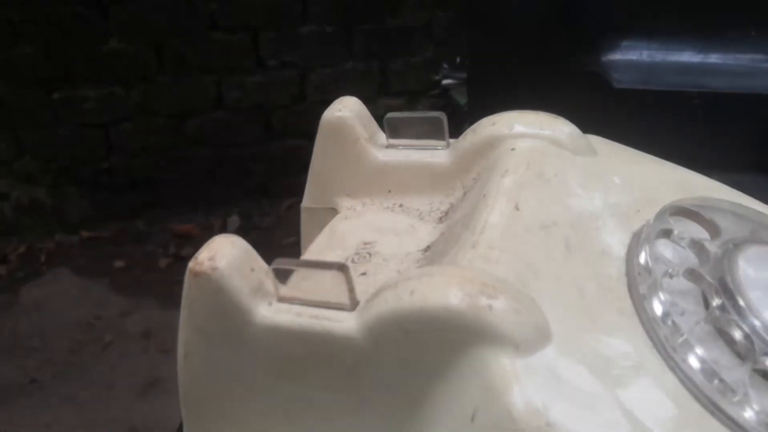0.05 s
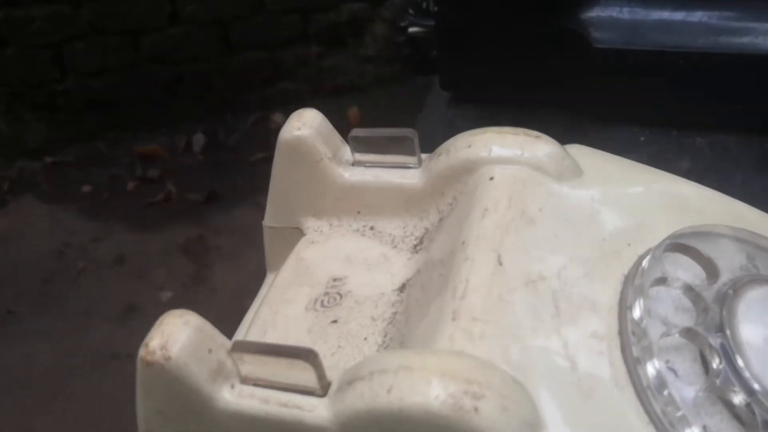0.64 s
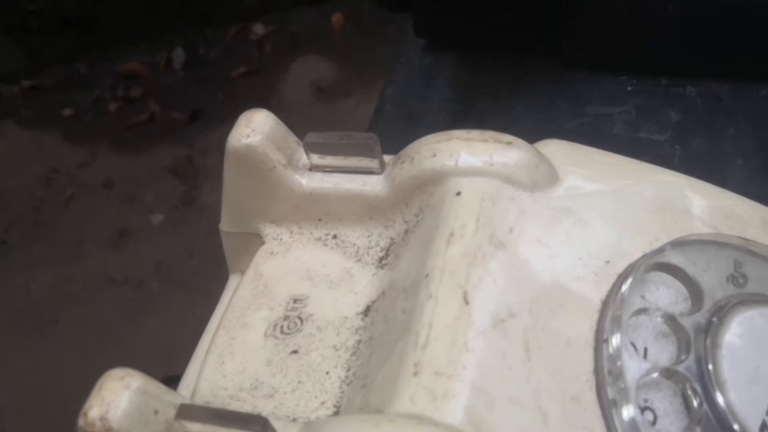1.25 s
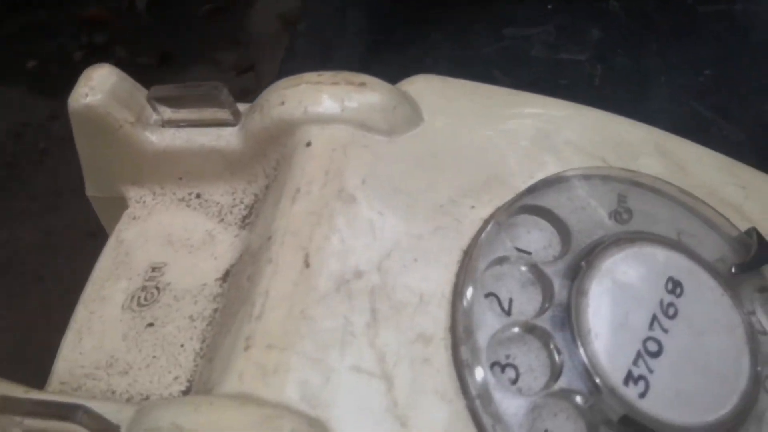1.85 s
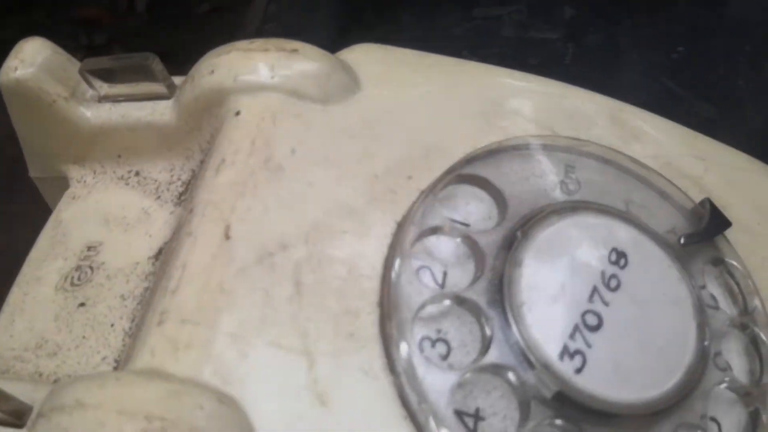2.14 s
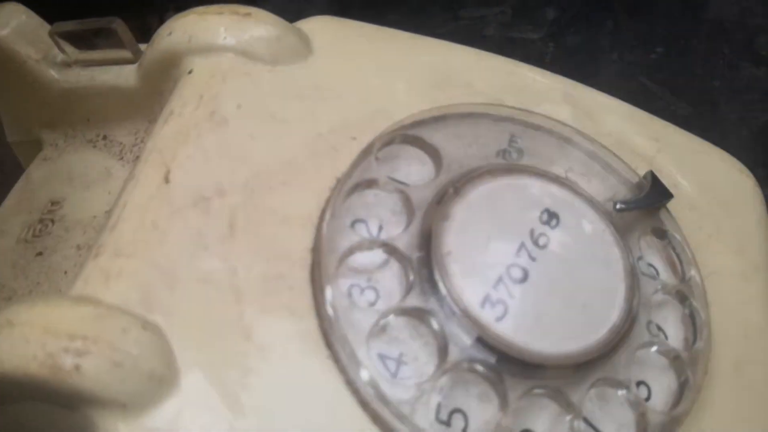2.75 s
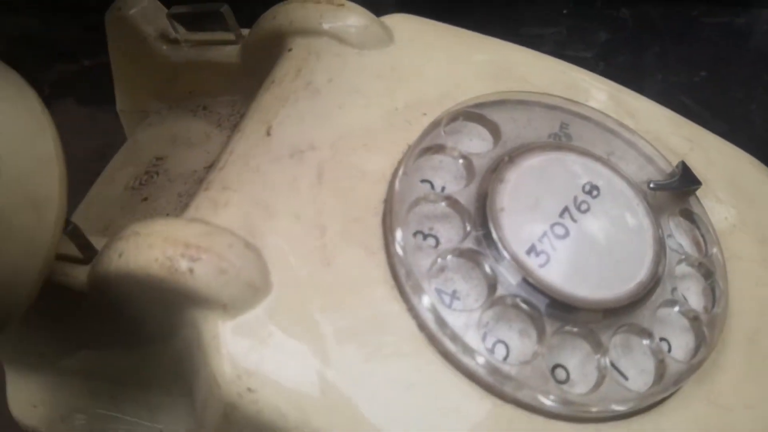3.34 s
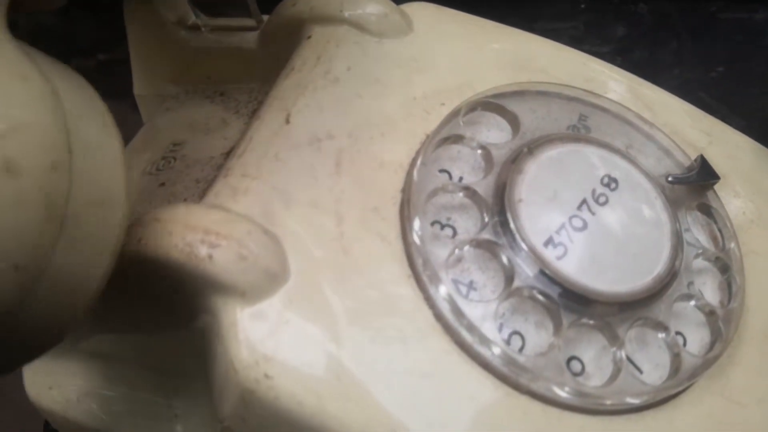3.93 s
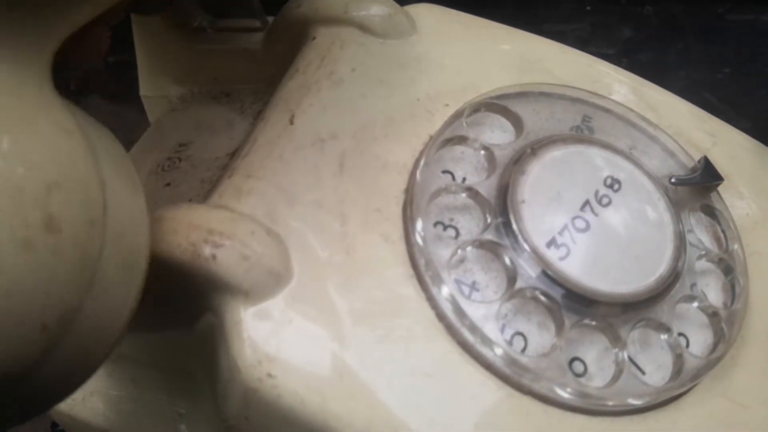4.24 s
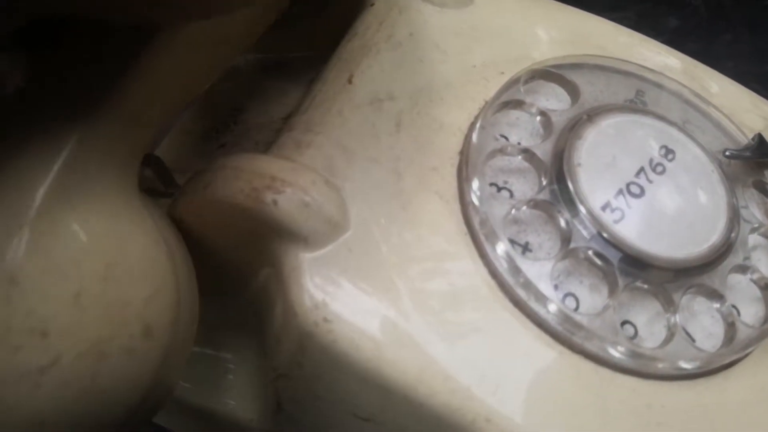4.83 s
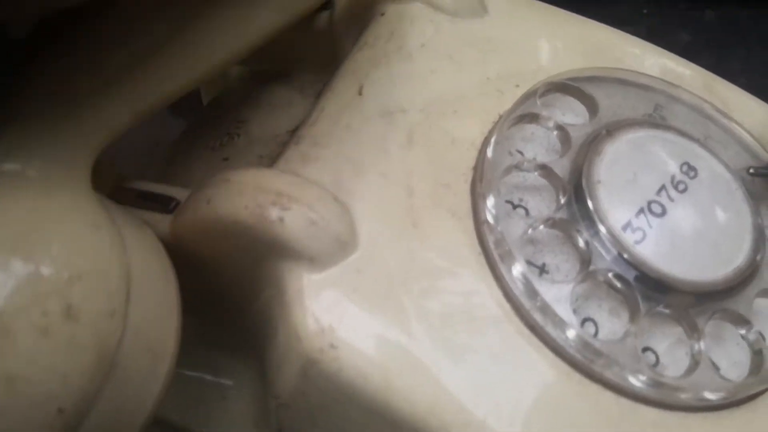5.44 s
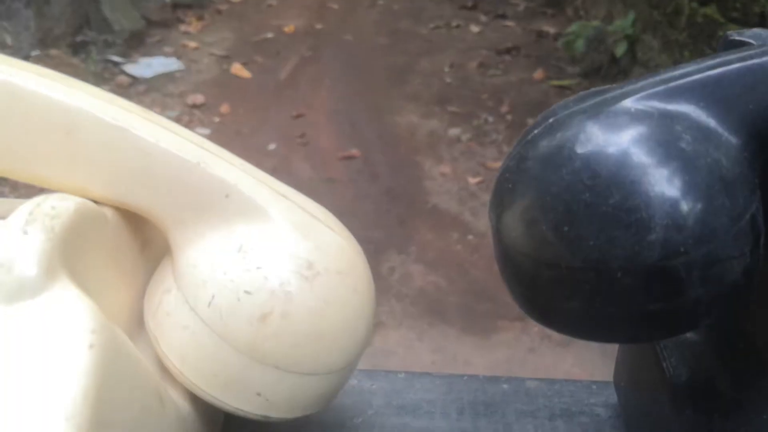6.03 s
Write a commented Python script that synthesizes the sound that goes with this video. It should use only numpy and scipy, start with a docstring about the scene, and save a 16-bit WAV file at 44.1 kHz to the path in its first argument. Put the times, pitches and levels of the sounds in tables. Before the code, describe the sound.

A low murmur of outside air fills a quiet room throughout, with a few barely audible bird whistles far away. A faint hiss lies under the first 1.5 seconds. Close to the microphone, fingers tick on a plastic telephone handset at about 0.7 seconds, then tick and rub between 1.2 and 1.6 seconds. Two soft scuffs follow near 2.4 and 2.9 seconds. From 3.2 seconds the handset is fumbled onto its cradle: uneven plastic clacks, hollow thumps and small rattles, coloured by brief rings and squeaks. Contacts come around 3.6, 4.1 and 4.4 seconds, with the hardest clack at 4.6, more knocks near 4.85 and a last settling thump around 5.1. Just before 6 seconds a finger ticks and slips, then makes one sharp pop at the microphone on the right, the loudest sound, followed by a brief rub.

```python
"""A room with an old dial telephone; outside air murmurs and a few far birds whistle.
A faint steady hiss lies under the first second and a half. A plastic handset is picked up
close to the microphone and fumbled onto the cradle. Fingers tick, rub and make one sharp pop.
Each contact clacks in the shell, thumps in the hollow case and rattles loose parts.
Brief rings colour the knocks and scuffs, with a few squeaks."""
import sys
import numpy as np
from scipy import signal
from scipy.fft import rfft, irfft
from scipy.io import wavfile
from scipy.ndimage import uniform_filter1d

SR = 44100
rng = np.random.default_rng(int(sys.argv[2]) if len(sys.argv) > 2 else 0)


def persist_wave(psi):
    """Save psi, clipped to +-1, as 16-bit WAV."""
    counts = np.round(np.clip(psi, -1, 1) * 32767).astype(np.int16)
    wavfile.write(sys.argv[1], SR, np.atleast_2d(counts).T)


N = 272538
TIME_S = np.arange(N) / SR

# Stereo field. Each row: frequency in Hz, left-right correlation.
CORRELATION = [(60, 1), (150, 0.97), (250, 0.85), (400, 0.14), (800, -0.33), (2000, 0.12), (12000, -0.12)]
# Shading of a source off to the right. Each row: frequency in Hz, left minus right in dB.
SIDE_SHADE = [(250, 0), (800, -4), (2000, -4), (6000, -10.5), (15000, -1)]
# Noise spectra. Each row: frequency in Hz, relative level in dB.
AIR_SPECTRUM = [(20, -6), (60, -3), (126, -1.5), (200, -8.5), (250, -8), (400, -17), (700, -20),
                (1200, -19.5), (1900, -17.5), (3000, -24.5), (3900, -28.7), (7200, -31.2), (9000, -43),
                (15500, -44)]
ROOM_SPECTRUM = [(70, 0), (220, 11.5), (500, -3.5), (1600, -2), (3500, -3.5), (7400, -2), (8800, -19.5),
                 (15500, -37.5)]
HISS_SPECTRUM = [(29, -22), (50, -13.5), (113, 1.5), (214, -12.5), (259, -17.5), (518, -35), (570, -14),
                 (643, -36), (742, -15.5), (876, -20), (2280, -17.5), (7330, -21.5), (15000, -54)]
SLIP_SPECTRUM = [(88, -8), (150, -2), (687, -14.5), (1180, -9.5), (1540, -0.5), (1870, -1.5), (2360, 3),
                 (4290, -5.5), (6940, -3.5), (7640, -6.5), (11900, -30.5), (13600, -29), (15000, -44)]
SCUFF_SPECTRUM = [(400, -20), (600, 0), (800, -1.5), (1000, 0), (1250, -0.5), (1700, 0.5), (1930, 1.5),
                  (2150, -3.5), (2420, 0), (3100, -12.5), (5000, -14.5), (7300, -17), (9000, -29),
                  (15000, -42)]
SHELL_SPECTRUM = [(70, -6.5), (160, -7.5), (370, -2.5), (540, -5.5), (750, -2), (980, 0), (1300, -3),
                  (1650, 2), (2500, -1.5), (3200, -9), (4400, 1), (5600, 3), (7200, -5.5), (8800, -22),
                  (15500, -40.5)]
# Bird calls. Each row: start and end in seconds, start and end pitch in Hz, relative level in dB.
BIRD_CALLS = [(0.38, 0.62, 730, 1080, -65), (0.59, 0.74, 1130, 1165, -62.5),
              (0.12, 0.47, 2030, 1974, -67.5), (1.602, 1.92, 3050, 2900, -68), (1.95, 2.3, 1680, 1580, -69),
              (2.674, 2.841, 7130, 6420, -69.5), (2.955, 3.093, 5850, 5600, -67.5),
              (4.448, 4.61, 6930, 6520, -64), (5.22, 5.358, 2520, 2440, -67.5)]
# Slips that catch abruptly. Each row: start and end in seconds, start and end level in dB.
GRIP_SLIPS = [(3.873, 4.027, -52, -64), (4.278, 4.364, -65, -64.5), (5.934, 5.964, -37, -36.5),
              (5.96, 6.125, -52.5, -42), (6.125, 6.194, -41, -47)]
# Swells. Each row: time of full level in seconds, hold in seconds, relative level in dB.
HISS_SWELLS = [(.1, 1.45, -71.3), (1.19, .06, -71), (1.312, .06, -53.5)]  # steady background hiss, then two finger strokes
HANDSET_SCUFFS = [(2.397, .04, -53), (2.937, .04, -50.5)]
# Ticks of the grip. Each row: start in seconds, peak in dB.
GRIP_TICKS = [(0.747, -48), (1.261, -41), (1.303, -33.5), (1.358, -34.5), (1.559, -33.5), (2.812, -47),
              (5.240, -53), (5.890, -34.5)]
# Brief rings and squeaks. Each row: start in seconds, T60 in seconds, pitch in Hz, level in dB.
BRIEF_RINGS = [(2.385, .2, 1925, -57.5), (2.925, .22, 2423, -50), (3.205, .022, 3840, -26),
               (3.207, .022, 2200, -28), (3.273, .025, 4020, -44), (3.286, .12, 1606, -46),
               (3.614, .03, 820, -31.5), (4.076, .03, 4700, -44), (4.374, .08, 2357, -30.5),
               (4.675, .016, 5130, -32), (4.722, .023, 5200, -32)]
# Modes of handset and case. Each row: frequency in Hz, relative level in dB, T60 in seconds.
PHONE_MODES = [(167, -8.5, .1), (197, -0.5, .07), (245.7, 2, 0.12), (328, -1.5, 0.12), (382, -2.5, 0.055),
               (682, -6, .06), (767, -3, .07), (886, -1, 0.063), (992, 5, 0.038), (1100, -12, 0.049),
               (1390, -4.5, .05), (1628, 6.5, 0.075), (1800, 4.5, 0.02), (2044, -4, .05),
               (2396, -2.5, 0.093), (2518, -7.5, 0.076), (2820, -3, .05), (3824, -7, 0.066),
               (4360, -3, .07), (4880, -5.5, .06), (5000, 1, .1), (5080, 2, .06), (5420, -7, 0.1),
               (5550, -6, .08), (6340, -8.5, 0.036), (7047, -7, .06)]
# Thump, knock, clack and tick bands. Each row: low edge in Hz, high edge in Hz.
CONTACT_BANDS_HZ = [(85, 470), (500, 1250), (1250, 3000), (3000, 12000)]
# Handset on cradle. Each row: start in seconds, length in seconds, clack level in dB,
# weight (thump above clack) in dB, softness (tick below clack) in dB.
CRADLE_CONTACTS = [(3.2042, .0053, -30.5, -22, 0.5), (3.2375, .0015, -40.5, 0, 28),
                   (3.26, .006, -47, -7, 18), (3.283, .006, -57, -10, 12), (3.343, .003, -59, 5, 24),
                   (3.583, .002, -60, -8, 18), (3.614, .003, -37.5, -4, 23), (3.632, .004, -48.5, -3, 16),
                   (4.076, .002, -42, 6, 10), (4.087, .005, -46, 5, 9), (4.178, .002, -58, -20, 12),
                   (4.369, .0094, -38.5, -15, 10), (4.39, .0033, -39, -14, 12), (4.417, .004, -55, 4, 16),
                   (4.544, .0024, -53, -20, 24), (4.601, .002, -48, -10, 16), (4.6186, .0038, -30, -17, -2),
                   (4.622, .0059, -18.3, -18, 4.7), (4.661, .008, -35, 6, 21), (4.7065, .003, -32, -4, 25),
                   (4.7215, .002, -37, 5.5, 5), (4.8468, .0023, -37, 7, 6), (4.8505, .003, -30, 3, 9),
                   (4.859, .0053, -33.5, -0.5, 8), (4.875, .006, -39, -20, 3),
                   (5.0865, .014, -42.5, -11, 10), (5.103, .005, -47, -10, 11),
                   (5.1185, .004, -36.5, 5, 18), (5.146, .004, -49, -15, 7)]


def from_db(db):
    return 10 ** (np.asarray(db) / 20)


def rms(x):
    return np.sqrt(np.mean(x ** 2) + 1e-24)


def pan(left_db):
    return from_db(np.array([[left_db], [-left_db]]) / 2)


def at_hz(points, hz):
    knots_hz, values = np.transpose(points)
    return np.interp(np.log(np.maximum(hz, 1)), np.log(knots_hz), values)


def add(out, start_s, sound):
    i = round(start_s * SR)
    out[:, i:i + sound.shape[-1]] += sound[..., :N - i]


def drift(rate_hz, size=N):
    """Straight lines between Gaussian random points."""
    position = np.arange(size) / SR * rate_hz
    count = int(position[-1]) + 2
    return np.interp(position, np.arange(count), rng.standard_normal(count))


def noise(spectrum, size=N, aside=0.0):
    """Coloured stereo noise, rms 1, correlated in the bass; aside shades the left."""
    hz = np.fft.rfftfreq(size, 1 / SR)
    mid, side = rfft(rng.standard_normal((2, size)))
    alike = np.clip(at_hz(CORRELATION, hz), -1, 1)
    sign = np.array([[1], [-1]])
    gain = from_db(at_hz(spectrum, hz) + sign * aside * at_hz(SIDE_SHADE, hz) / 2)
    x = irfft((np.sqrt(1 + alike) * mid + np.sqrt(1 - alike) * side * sign) * gain, size)
    return x / rms(x)


def whistle(hz, width_hz):
    """Tone on a pitch track, rms 1; each side wavers separately."""
    waver = np.array([drift(4 * width_hz, len(hz)) for _ in range(2)])
    cycles = np.cumsum(hz + width_hz * waver, axis=1) / SR + rng.random((2, 1))
    return np.sqrt(2) * np.sin(2 * np.pi * cycles)


def outside_air(level_db=-58.9, waver_db=1.7):
    """Low murmur with a faint hiss, stronger on the right."""
    return from_db(level_db + waver_db * drift(5.9)) * noise(AIR_SPECTRUM, aside=.42)


def far_birds(waver_share=.02, echo_t60_s=.57, echo_db=-3.5, direct_db=-2.0):
    """Thin whistles, smeared by echoes from walls and trees."""
    out, t = np.zeros((2, N)), np.arange(2 ** 14) / SR
    for start_s, end_s, start_hz, end_hz, db in BIRD_CALLS:
        size = int((end_s - start_s) * SR)
        hz = np.linspace(start_hz, end_hz, size)
        call = from_db(db) * np.hanning(size) * whistle(hz, waver_share * start_hz)
        echoes = rng.standard_normal((2, len(t))) * from_db(-60 * t / echo_t60_s)
        echoes /= np.linalg.norm(echoes[0])
        add(out, start_s, from_db(direct_db) * call)
        add(out, start_s, from_db(echo_db) * signal.fftconvolve(call, echoes, axes=1))
    return out


def swell_envelope(rows, rise_db_per_s, fall_db_per_s):
    """Each row rises, holds and fades."""
    envelope = np.zeros(N)
    for full_s, hold_s, db in rows:
        before_db = rise_db_per_s * np.maximum(full_s - TIME_S, 0)
        after_db = fall_db_per_s * np.maximum(TIME_S - full_s - hold_s, 0)
        envelope += from_db(db - before_db - after_db)
    return envelope


def hiss_and_rubbing(hiss_gain_db=4.5, grain_db=2.0, edge_s=.002):
    """Faint background hiss for the first 1.5 s; grainy strokes, scuffs and slips of the grip."""
    slip = np.zeros(N)
    for start_s, end_s, start_db, end_db in GRIP_SLIPS:
        sliding = (TIME_S >= start_s) & (TIME_S <= end_s)
        slip += sliding * from_db(np.interp(TIME_S, [start_s, end_s], [start_db, end_db]))
    slip = uniform_filter1d(slip, int(edge_s * SR))
    hiss = swell_envelope(HISS_SWELLS, rise_db_per_s=125, fall_db_per_s=155)
    scuff = swell_envelope(HANDSET_SCUFFS, rise_db_per_s=700, fall_db_per_s=190)
    out = slip * noise(SLIP_SPECTRUM, aside=.48)
    out += hiss * from_db(hiss_gain_db) * noise(HISS_SPECTRUM, aside=1.12)
    out += scuff * noise(SCUFF_SPECTRUM, aside=.93)
    return out * from_db(grain_db * drift(250))


def grip_ticks(t60_s=.013):
    """Dry ticks of skin and casing."""
    out, t = np.zeros((2, N)), np.arange(2 ** 11) / SR
    for start_s, peak_db in GRIP_TICKS:
        tick = noise(HISS_SPECTRUM, len(t), aside=.84) * from_db(-60 * t / t60_s)
        add(out, start_s, tick * from_db(peak_db) / np.abs(tick).max())
    return out


def finger_pop(start_s=5.9697, level_db=-.4, left_db=-15.0, left_lag_s=.0006, overtone=.18):
    """Sharp pop at the right microphone port; falls in pitch, reflects once off the case."""
    start_hz, end_hz, half_fall_s = 1830, 470, .0031
    attack_s, hold_s, t60_s = .0006, .0016, .005
    tail_db, tail_t60_s = -8.5, .018
    bounce_s, bounce_db = .002405, -10.5
    out, t = np.zeros((2, N)), np.arange(2 ** 10) / SR
    hz = end_hz + (start_hz - end_hz) / (1 + (t / half_fall_s) ** 6)
    phase = 2 * np.pi * np.cumsum(hz) / SR
    decay_s = np.maximum(t - attack_s - hold_s, 0)
    decay_db = np.maximum(-60 * decay_s / t60_s, tail_db - 60 * decay_s / tail_t60_s)
    envelope = np.minimum(t / attack_s, 1) * from_db(decay_db)
    pop = from_db(level_db) * envelope * np.sin(phase + 2 * overtone * envelope * np.sin(phase))
    for arrival_s, gain in [(start_s, 1), (start_s + bounce_s, from_db(bounce_db))]:
        add(out[1:], arrival_s, gain * pop)
        add(out[:1], arrival_s + left_lag_s, gain * from_db(left_db) * pop)
    return out


def brief_rings(left_db=6.0, swell_share=.06, waver_cycles=6.0):
    """Decaying tones that colour knocks and scuffs, and a few squeaks; shorter ones are rougher."""
    out, t = np.zeros((2, N)), np.arange(2 ** 13) / SR
    for start_s, t60_s, hz, db in BRIEF_RINGS:
        swell_s = swell_share * t60_s
        envelope = np.minimum(t / swell_s, 1) * from_db(db - 60 * np.maximum(t - swell_s, 0) / t60_s)
        add(out, start_s, envelope * whistle(np.full(len(t), hz), waver_cycles / t60_s))
    return out * pan(left_db)


def phone_response(t, scatter_db=3.0, grip_detune=.012, right_lag_s=.00022):
    """One blow: clear modes detuned by the hand's load, a crack of dense shell modes, the room."""
    shell_db, shell_t60_s = 15.5, .036
    room_db, room_t60_s, room_rise_s = -7.0, .41, .0089
    out = np.zeros((2, len(t)))
    port_t = t - np.array([[0], [right_lag_s]])
    for hz, db, t60_s in PHONE_MODES:
        hz *= 1 + grip_detune * min(1, 300 / hz) * rng.normal()
        # High modes reach the two sides with unrelated phases.
        spread_rad = np.sqrt(1 - np.clip(at_hz(CORRELATION, hz), 0, 1)) * min(hz / 3000, 2)
        phase = 2 * np.pi * hz * port_t + spread_rad * rng.normal(0, 1, (2, 1))
        polarity = rng.choice([-1, 1])
        out += polarity * from_db(db + rng.normal(0, scatter_db) - 60 * t / t60_s) * np.sin(phase)
    crack = noise(SHELL_SPECTRUM, len(t)) * from_db(shell_db - 60 * t / shell_t60_s)
    room = noise(ROOM_SPECTRUM, len(t)) * from_db(room_db - 60 * t / room_t60_s)
    return out + crack + room * (1 - np.exp(-t / room_rise_s))


def rocking(firm_db=-38.5, delay_s=.018, length_s=.004, loss_db=13, weight_db=-12, softness_db=7.5):
    """Extra contact rows: after each firm thump the handset rocks back lightly onto an edge."""
    thumps = [(start_s, clack_db + above_db) for start_s, _, clack_db, above_db, _ in CRADLE_CONTACTS]
    return [(start_s + delay_s, length_s, thump_db - loss_db, weight_db, softness_db)
            for start_s, thump_db in thumps if thump_db > firm_db]


def handset_on_cradle(chatter=.4, rattle=.35, rattle_t60_s=.13, thump_rise_s=.0026):
    """Each contact drives the phone with a first push, tiny slips and a rattle of loose parts."""
    band_left_db = (0, 5.5, 2, -2)
    out, t = np.zeros((2, N)), np.arange(2 ** 14) / SR
    onset = t < .02
    for start_s, length_s, clack_db, weight_db, softness_db in CRADLE_CONTACTS + rocking():
        slips = rng.standard_normal(len(t)) * (rng.random(len(t)) < .15)
        loose = rng.standard_normal(len(t)) * (rng.random(len(t)) < .012)
        force = chatter * slips * (t < length_s) + rattle * loose * from_db(-60 * t / rattle_t60_s)
        force[0] = 1
        response = phone_response(t)
        clatter = signal.fftconvolve(response, force[None], axes=1)[:, :len(t)]
        # The heavy case answers only the first push, and builds up gradually.
        thump = response * (1 - np.exp(-t / thump_rise_s))
        knock_db = clack_db - .5 + .3 * weight_db
        levels_db = [clack_db + weight_db, knock_db, clack_db, clack_db - softness_db]
        sources = [thump, clatter, clatter, clatter]
        for source, edges_hz, db, left_db in zip(sources, CONTACT_BANDS_HZ, levels_db, band_left_db):
            bandpass = signal.butter(3, edges_hz, "band", fs=SR, output="sos")
            part = signal.sosfilt(bandpass, source) * pan(left_db)
            add(out, start_s, part * from_db(db) / rms(part[:, onset]))
    return out


def scene():
    close = handset_on_cradle() + brief_rings() + grip_ticks() + hiss_and_rubbing() + finger_pop()
    return close + far_birds() + outside_air()


def record(dry):
    """Clip at full scale, then a steep low-pass."""
    cutoff_hz = 15700
    lowpass = signal.ellip(10, .1, 80, cutoff_hz, fs=SR, output="sos")
    return signal.sosfilt(lowpass, np.clip(dry, -1, 1))


dry = scene()
out = record(dry)
persist_wave(out)
```